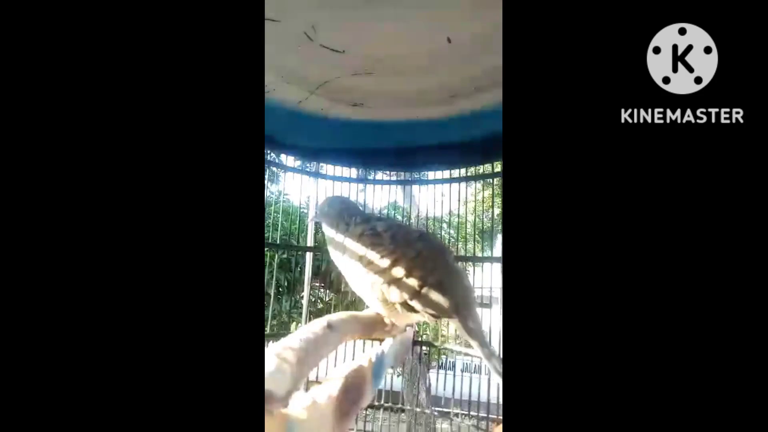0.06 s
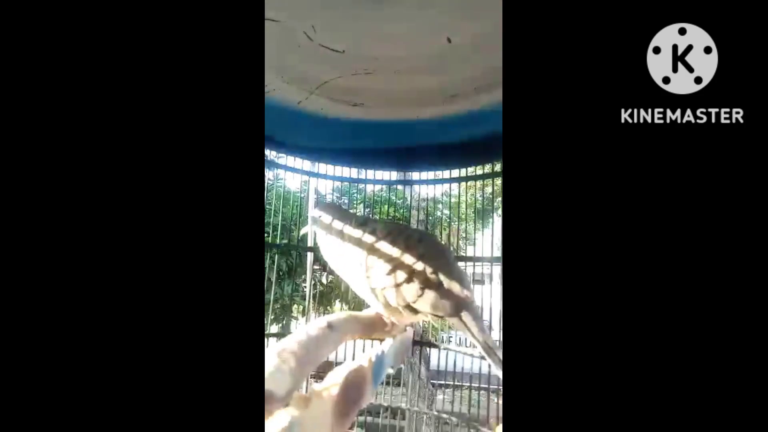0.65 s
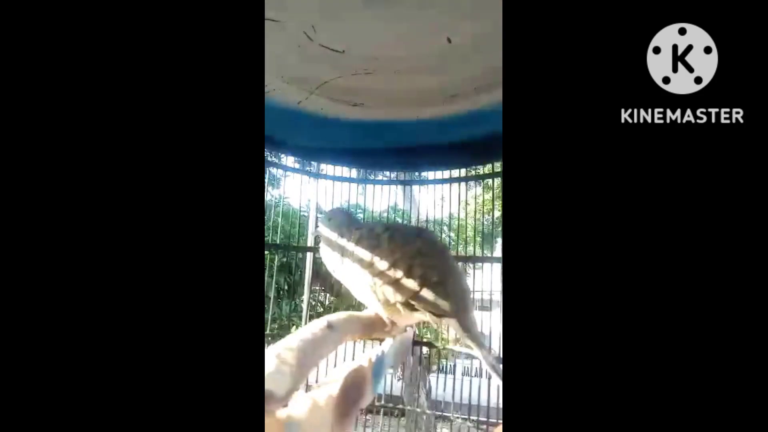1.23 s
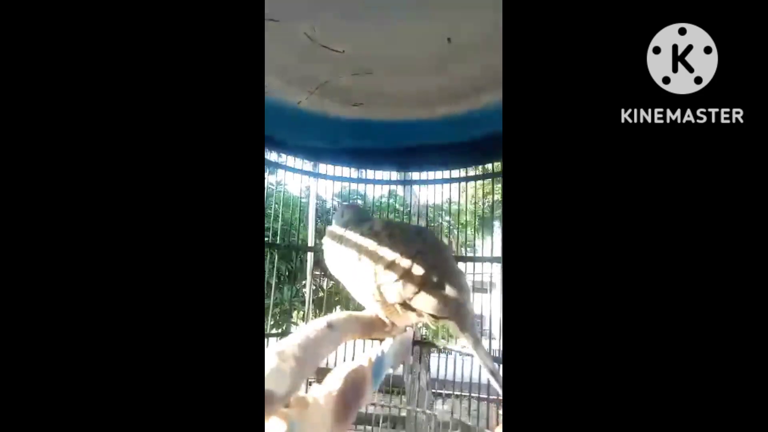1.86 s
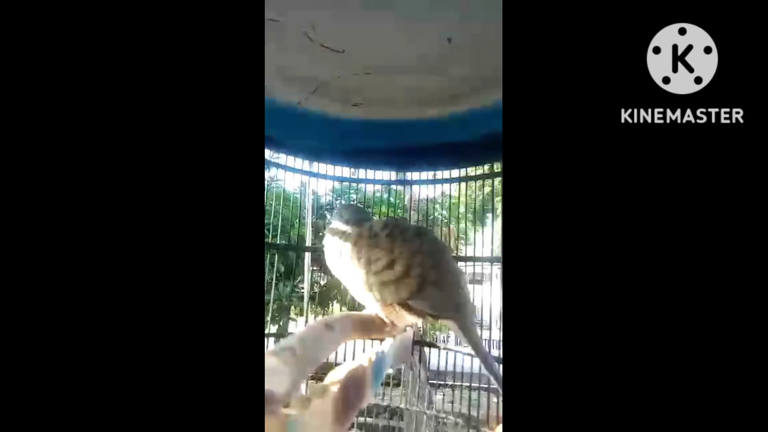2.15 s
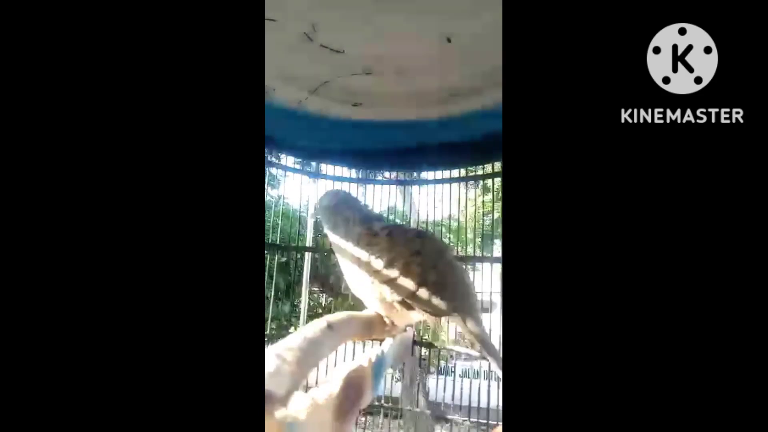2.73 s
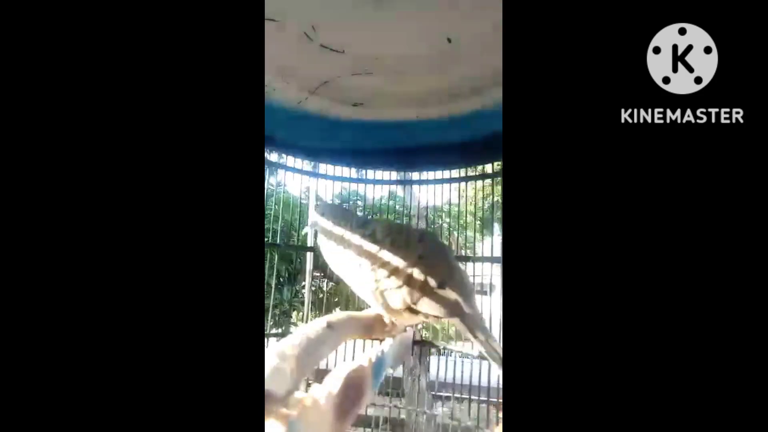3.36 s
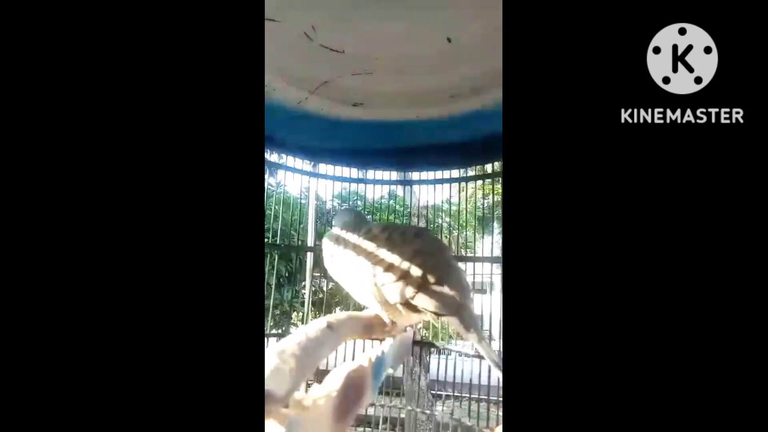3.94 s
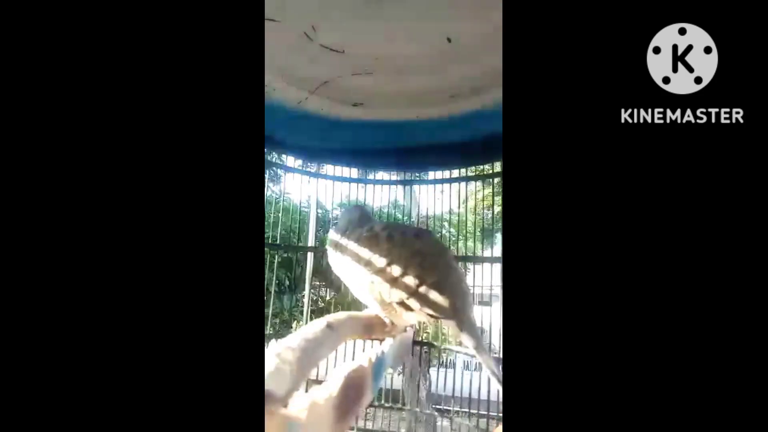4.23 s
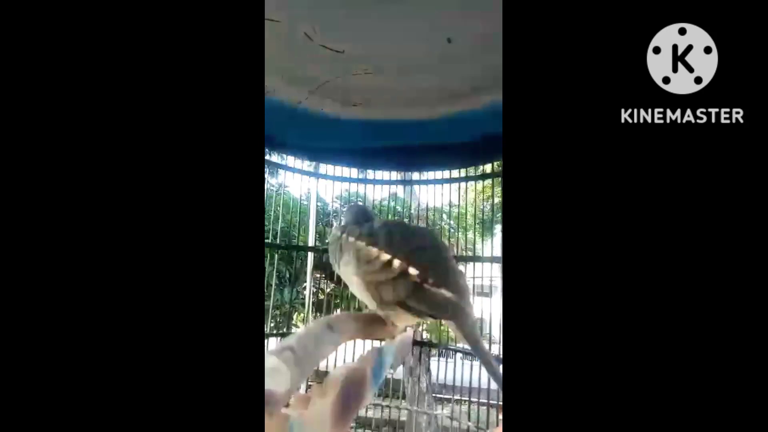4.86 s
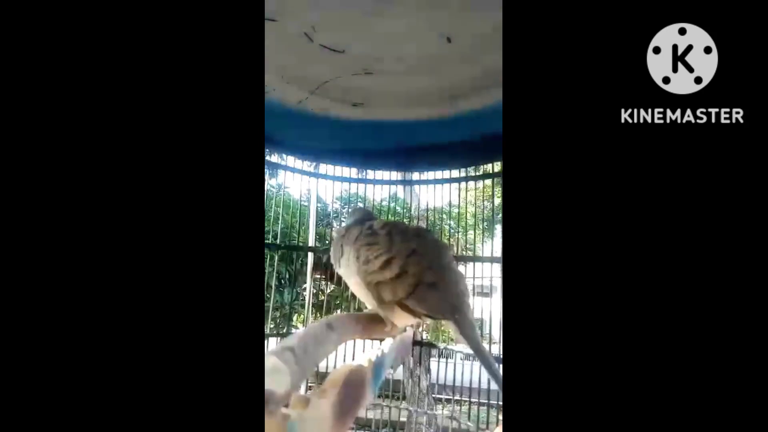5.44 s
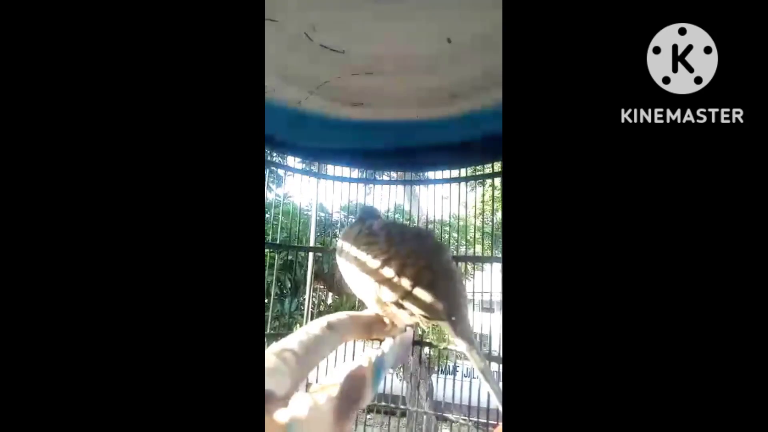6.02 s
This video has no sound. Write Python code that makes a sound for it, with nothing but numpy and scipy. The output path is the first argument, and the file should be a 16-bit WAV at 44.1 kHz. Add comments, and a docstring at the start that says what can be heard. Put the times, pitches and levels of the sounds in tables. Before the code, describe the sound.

A small caged dove coos right at the microphone from about 0.2 to 0.8 seconds: five quick, clipped notes, loud and ringing, with a slight overload buzz. Faint, high chirps from small birds follow between 1.2 and 2.7 seconds, and wings flutter softly farther off from about 2 to 2.9 seconds. The dove repeats its five-note phrase from 3 to 3.6 seconds. After a soft thump, a rooster crows some way off from about 3.9 to 5.6 seconds, quieter than the dove, in four syllables that crack upward in pitch, with some hoarseness and a light outdoor echo. A rasp and a few more chirps overlap the last syllable, and faint rustles trail on until 6 seconds. Throughout, a breeze buffets the microphone with an uneven low rumble over a quiet hiss of leaves and distant streets, both dipping briefly under the coos.

```python
"""Caged dove and rooster in a garden

A small dove coos two quick phrases in a domed cage, right at a phone's microphone. The dome resonates
at the top of each note and overloads the left port, and a suppressor ducks the garden. Then a rooster
crows some way off, four syllables that break between two registers; a rasp and faint rustles trail it.
Small birds chirp, wings flutter, leaves and distant streets hiss, and a breeze buffets the microphone."""
import sys
import numpy as np
from scipy import signal
from scipy.fft import rfft, irfft, next_fast_len
from scipy.io import wavfile
from scipy.ndimage import uniform_filter1d

SR = 44100
rng = np.random.default_rng(int(sys.argv[2]) if len(sys.argv) > 2 else 0)


def dump_mix(stems):
    """Bounce the given channels to the path in sys.argv[1] as a 16-bit WAV at rate SR."""
    frames = np.atleast_2d(stems).T  # one column per channel
    limited = np.clip(frames, -1, 1)  # hard clip at full scale
    pcm = np.round(limited * 32767).astype(np.int16)
    wavfile.write(sys.argv[1], SR, pcm)


N = 272979
TIME = np.arange(N) / SR
FREQS = np.fft.rfftfreq(N, 1 / SR)


def amp(db):
    return 10 ** (np.asarray(db) / 20)


def unit_rms(x):
    return x / np.sqrt(np.mean(abs(x) ** 2) + 1e-20)


def curve_at(hz, points, column=1):
    """Interpolates a table's column on a log-frequency axis."""
    points = np.array(points, float)
    return np.interp(np.log(hz + 1), np.log(points[:, 0] + 1), points[:, column])


def resonance(hz, centre, width):
    """A Lorentzian peak of height 1, with its full width taken at half height."""
    return 1 / (1 + (2 * (hz - centre) / width) ** 2)


def add(mix, start_s, sound):
    """Superposes a sound on the mix, in place."""
    part = mix[max(round(start_s * SR), 0):][:len(sound)]
    part += sound[:len(part)]


def noise(gain):
    """White noise filtered by a gain for each of FREQS."""
    return irfft(rfft(rng.standard_normal(N)) * gain, N)


def wander(rate_hz):
    """A low-passed random fluctuation of rms 1."""
    return unit_rms(noise(1 / (1 + (FREQS / rate_hz) ** 4)))


def yard(x, wet_db, echo_db, echo_s=0.11, reflections_per_s=2000):
    """Reflection between houses: the direct sound, one wall's echo and a diffuse tail for each port."""
    # Reverberation. Each row: frequency in Hz, time to decay by 60 dB in seconds.
    decay_times = [(500, 0.6), (1600, 0.85), (4000, 0.77), (9000, 0.18)]
    taps = rng.standard_normal((2, SR)) * (rng.random((2, SR)) < reflections_per_s / SR)
    hz, t, spectra = signal.stft(taps, SR, nperseg=256)
    decay = amp(-60 * t / curve_at(hz, decay_times)[:, None])
    tail = signal.istft(spectra * decay, SR, nperseg=256)[1]
    tail /= np.linalg.norm(tail, axis=1, keepdims=True)
    echo = np.interp(TIME - echo_s, TIME, x, left=0)
    return x + amp(echo_db) * echo + amp(wet_db) * signal.fftconvolve(x[None], tail, axes=1)[:, :N]


def garden(coherence=0.15):
    """Leaves and distant streets sum to a diffuse hiss, only partly coherent between the ports."""
    # Hiss spectrum. Each row: frequency in Hz, left and right spectral density in dB.
    spectrum = [(100, -74.5, -74.5), (493, -65, -74.5), (950, -64.5, -74), (1720, -68.5, -82),
                (2430, -69, -80), (2760, -72, -85), (4060, -70, -83.5), (5070, -83, -100),
                (6440, -90.5, -92), (10800, -106, -100), (12400, -108, -108), (15000, -102, -114)]
    # Slow swell of the hiss. Each row: time in seconds, gain in dB.
    levels = [(0, 0), (.97, -0.5), (1.53, 0), (1.68, -5), (1.8, 1), (2.7, 1.5), (2.83, -1.5), (3.2, -2),
              (3.65, 2), (4.1, 2), (6.19, -0.5)]
    left, independent = rfft(rng.standard_normal((2, N)))
    right = coherence * left + np.sqrt(1 - coherence ** 2) * independent
    colour = amp([curve_at(FREQS, spectrum, column) for column in (1, 2)])
    hiss = irfft(colour * [left, right], N)
    swell = amp(np.interp(TIME, *np.transpose(levels)) + .7 * wander(35))
    return np.sqrt(SR / 2) * hiss * swell


def breeze(lump_db=3.0, eddy_hz=350, eddy_growth=0.69):
    """Turbulence, separate at each port: in a gust, small eddies grow faster than large ones."""
    # Gusts. Each row: time in seconds, relative level in dB, left minus right in dB.
    gusts = [(0, -20, 16), (.14, -19, 16.5), (.205, -21.5, 15), (.24, -22.5, 14), (0.471, -24.5, 11),
             (.525, -21.5, 12.5), (.6, -27, 16), (.9, -26.5, 5.5), (1.32, -19.5, 16), (1.78, -17, 9.5),
             (1.97, -20.5, 5), (2.009, -34, 5), (2.23, -32, 5.5), (2.33, -25, -5), (2.531, -20, 15.5),
             (2.721, -24.5, 0.5), (2.765, -15.5, 11.5), (2.93, -16.5, 10), (3.03, -21, 4.5),
             (3.2, -20.5, 12.5), (3.26, -15.5, 13), (3.34, -22.5, 15.5), (3.4, -18.5, 9), (3.461, -24, 11),
             (3.581, -28, 6.5), (3.65, -15.5, -13.5), (3.739, -18, -4), (3.85, -17.5, 15), (4.6, -22, 16),
             (4.92, -16, 15.5), (5.071, -25, 2.5), (5.37, -16.5, 8.5), (5.58, -20.5, 11.5),
             (5.645, -16, -1), (5.759, -17, -0.5), (5.859, -17, 7), (6.19, -14.5, 9.5)]
    # Buffeting spectrum. Each row: frequency in Hz, left and right relative level in dB.
    buffet = [(15, -15, -21.5), (42.5, -24.5, -18), (75.3, -6.5, -1.5), (142, -0.5, -3), (199.5, -6, -2.5),
              (299, -18, -6.5), (446, -34.5, -16.5), (764, -49.5, -29), (1510, -76, -65),
              (6000, -110, -100)]
    times, db, lean_db = np.transpose(gusts)
    left_share = 1 / (1 + amp(-lean_db) ** 2)
    ports = []
    for column, power_share in enumerate([left_share, 1 - left_share], 1):
        push = np.interp(TIME, times, 2 * amp(db) * np.sqrt(power_share)) * amp(lump_db * wander(24.6))
        colour = amp(curve_at(FREQS, buffet, column))
        large = noise(colour * (FREQS < eddy_hz))
        small = noise(colour * (FREQS >= eddy_hz))
        ports.append(push * unit_rms(large + small * unit_rms(push) ** eddy_growth))
    return amp(-1.5) * np.array(ports)


def small_birds(arch_hz=189, warble_depth=0.017):
    """Frequency modulation: far-off whistles follow short arched glides with a fast warble."""
    # Chirps in the trees. Each row: start and length in seconds, pitch and sweep in Hz, level in dB.
    chirps = [(.005, 0.11, 4600, -1020, -39), (1.171, 0.075, 4180, 569, -41),
              (1.323, 0.089, 4350, -740, -40.5), (1.58, 0.057, 3990, -700, -42.5),
              (1.89, 0.19, 5850, 1898, -50), (2.092, 0.11, 4900, -400, -47),
              (2.374, 0.092, 3830, -780, -40), (2.57, 0.089, 4580, -600, -47.5),
              (4.902, 0.076, 3370, -46, -33.5), (5.278, 0.078, 3400, 2, -30.5),
              (5.421, 0.052, 2630, -250, -32.5), (5.477, 0.036, 3027, 556, -28),
              (5.733, 0.0824, 3450, 146, -30)]
    song, warble = np.zeros(N), 1 + warble_depth * wander(240)
    for start, length, pitch, sweep, db in chirps:
        along = np.linspace(0, 1, round(length * SR))
        hz = pitch + sweep * (along - .5) - arch_hz * (2 * along - 1) ** 2
        hz *= np.interp(start + along * length, TIME, warble)
        envelope = amp(db) * np.sqrt(4 * along * (1 - along))
        add(song, start, envelope * np.sin(2 * np.pi * np.cumsum(hz) / SR))
    return amp([[1], [-11]]) * yard(song, wet_db=-5, echo_db=-16)


def clucks(flap_s=.0005, flap_hz=900, gap_s=.0044):
    """Damped oscillation: the dove's syrinx flaps before a note, once or in a short rattle."""
    # Rattles. Each row: start in seconds, number of flaps, level in dB.
    rattles = [(0.164, 1, -2.5), (0.2194, 4, 1), (0.542, 1, 0), (0.676, 1, -6), (2.9287, 1, -2.5),
               (2.982, 4, 1), (3.291, 1, -4)]
    t = np.arange(0, 20 * flap_s, 1 / SR)
    flap = t / flap_s * np.exp(-t / flap_s + 2j * np.pi * flap_hz * t)
    voice = np.zeros(N, complex)
    for start, count, db in rattles:
        for k in range(count):
            add(voice, start + k * gap_s, amp(db) * np.sin(np.pi * (k + 1) / (count + 1)) * flap)
    return voice


def coos(end_hz=1049, slur_hz=1110, fall_s=.0107, fade_s=.0037, sag_db_per_hz=.0013):
    """Pressure-driven oscillation: breath lifts and drops the syrinx's pitch and level together."""
    # Coos. Each row: start and end in seconds, top pitch in Hz, level in dB, drift over the note in Hz,
    # swell over the note in dB, opening pitch in Hz, rise time in seconds.
    notes = [(0.2364, 0.364, 1179, -9.8, -86, -5.6, 483, .0093),
             (0.3693, 0.4049, 1193, -9.9, -38, -0.9, 1051, .0107),
             (0.4401, 0.4726, 1215, -9.2, -27, -2.5, 787, .0086),
             (0.55, 0.599, 1211, -9.4, -85, -3.3, 561, .0095),
             (0.6853, 0.8207, 1171, -10.8, -58, -6.3, 559, .011),
             (2.9981, 3.1183, 1170, -11.1, -55, -5.7, 650, .0098),
             (3.1242, 3.161, 1191, -11.2, -43, -4.3, 1072, .0116),
             (3.1895, 3.2259, 1148, -9.3, -113, 0.9, 776, .0071),
             (3.2961, 3.3425, 1193, -10.8, -34, -5.7, 634, .0089),
             (3.4228, 3.5542, 1158, -12.3, -35, -5.7, 569, .0086)]
    # Brief swells and dips of loudness in the long coos. Each row: time in seconds, gain in dB.
    swells_and_dips = [(.297, 2.4), (.311, -2.6), (.324, 1), (.752, 1), (3.058, .6), (3.074, -.8)]
    voice = np.zeros(N, complex)
    pauses = [following[0] - note[1] for note, following in zip(notes, notes[1:])] + [np.inf]
    for (start, end, top_hz, db, drift_hz, swell_db, first_hz, rise_s), pause in zip(notes, pauses):
        last_hz = slur_hz if pause < .012 else end_hz  # a coo that runs into the next falls less
        length = end - start
        t = np.arange(0, length, 1 / SR)
        from_middle = t / length - .5
        sag_hz = (top_hz - first_hz) * np.exp(-t / rise_s)
        sag_hz += (top_hz - last_hz) * np.exp((t - length) / fall_s)
        hz = top_hz - sag_hz + drift_hz * from_middle
        push_db = 2 * (first_hz < 700) * np.exp(-(t / .012) ** 2)  # extra air starts a slack syrinx
        level = amp(db + push_db + swell_db * from_middle - sag_db_per_hz * sag_hz)
        fade = np.clip(np.minimum(t, length - t) / fade_s, 0, 1)
        add(voice, start, level * fade * np.exp(2j * np.pi * np.cumsum(hz) / SR))
    for when, db in swells_and_dips:
        voice *= amp(db * np.exp(-((TIME - when) / .006) ** 2))
    return voice


def dove(octave_db=-29, shimmer=0.0054):
    """Forced resonance: each glide sweeps through the dome's modes and beats with their ringing."""
    # Air modes under the dome. Each row: frequency and bandwidth in Hz, left and right gain in dB,
    # phase at the right port in radians.
    modes = [(953.0, 68.2, 12.3, -1.1, 1.79), (1148.2, 21.8, 16.5, 1.7, -3.38),
             (1161.3, 11.3, -4.7, -16.6, -2.2), (1326.1, 130.1, -14.5, -0.9, -2.2),
             (1071.0, 70.3, -19.0, -6.7, 0.33)]
    voice = (clucks() + coos()) * (1 + shimmer * wander(500))
    ports = np.zeros((2, N))
    for hz, width, left_db, right_db, phase in modes:
        radius = np.exp(-np.pi * width / SR)
        pole = radius * np.exp(2j * np.pi * hz / SR)
        ring = signal.lfilter([1 - radius], [1, -pole], voice + 1e-18)
        ports += np.array([amp(left_db) * ring, amp(right_db) * np.exp(1j * phase) * ring]).real
    octave = (voice * np.exp(1j * np.angle(voice))).real  # goes straight out, past the modes
    reflected = yard(voice.real, wet_db=-27, echo_db=-40) - voice.real
    return ports + amp([[0], [-11]]) * (amp(octave_db) * octave + reflected)


def wings(beat_s=0.079, rise_s=.011, low_hz=600, high_hz=2500):
    """Air displacement: each wingbeat of a bird further off sheds a soft puff of noise."""
    # Bouts of wingbeats. Each row: first beat in seconds, number of beats, level in dB.
    flutters = [(2.069, 3, -33.5), (2.308, 2, -32.5), (2.469, 4, -29), (2.866, 1, -37)]
    age = np.arange(0, 10 * rise_s, 1 / SR) / rise_s
    puff = age * np.exp(1 - age)
    beats = np.zeros(N)
    for start, count, db in flutters:
        for k in range(count):
            add(beats, start + k * beat_s - rise_s, amp(db) * puff)
    band = 1 / (1 + (low_hz / (FREQS + 1)) ** 4) / (1 + (FREQS / high_hz) ** 8)
    air = [unit_rms(noise(band)) for _ in range(2)]
    return amp([[0], [-6]]) * beats * air


def noise_bursts(top_hz=6000):
    """Short noise bursts: a soft thump, a rasp with and after the last crow syllable, faint rustles."""
    # Bursts. Each row: start and length in seconds, centre and bandwidth in Hz, level in dB.
    bursts = [(3.789, 0.0075, 550, 594, -23), (4.933, 0.29, 1440, 2234, -27.5),
              (5.604, 0.13, 1820, 2885, -30.5), (5.88, 0.086, 1400, 2140, -35.5),
              (5.96, 0.055, 2540, 2200, -34)]
    sound = np.zeros(N)
    for start, length, centre, width, db in bursts:
        envelope = np.sin(np.pi * np.clip((TIME - start) / length, 0, 1))
        band = resonance(FREQS, centre, width) / (1 + (FREQS / top_hz) ** 4)
        sound += amp(db) * envelope * unit_rms(noise(band))
    return amp([[3], [-7]]) * sound


def throat_squeaks(length_s=0.014, width_hz=260):
    """Narrow-band noise: a brief squeak as the rooster's throat opens."""
    # Squeaks. Each row: start in seconds, centre in Hz, level in dB.
    catches = [(3.863, 2170, -30.5), (4.174, 2070, -25), (5.003, 1846, -25)]
    squeaks = np.zeros(N)
    for start, centre, db in catches:
        opening = np.sin(np.pi * np.clip((TIME - start) / length_s, 0, 1))
        squeaks += amp(db) * opening * unit_rms(noise(resonance(FREQS, centre, width_hz)))
    return squeaks


def syllable(start, end, up, down, low_hz, high_hz, effort_db, tiring_db_per_s, beak_db, roughness,
             fundamental_db, scoop, dull_db, break_s=0.009, settle_s=.026, droop_per_s=.22):
    """Register break: contours of a voice that jumps upward, then droops as the air runs out."""
    t, length = np.arange(start, end, .001), end - start
    high = (np.tanh((t - up) / break_s) - np.tanh((t - down) / break_s)) / 2
    low = 1 - high
    onset = np.exp((start - t) / settle_s)  # starts flat, rough and soft
    ending = np.exp((t - end) / (0.092 * length))
    hz = (high_hz * high + low_hz * low) * (1 - scoop * onset - droop_per_s * length * ending)
    effort = effort_db - 2.5 * low - 3.5 * onset - tiring_db_per_s * (t - start)
    shut = np.exp((start - t) / 0.072)  # the beak opens, then closes as the pitch droops
    beak = beak_db * (1 - shut) - 18.5 * shut - 20 * ending
    hoarse = np.clip(roughness * high + 0.1778 * low + .55 * onset, 0, 1)
    dull = dull_db * np.exp((t - end) / (0.44 * length))  # upper harmonics fade first
    return np.transpose([t, hz, effort, beak, hoarse, np.full(len(t), fundamental_db), dull])


def rooster(jitter=.05, waver=.016, fade_s=0.0078, beak_hz=3750, cage_hz=1571.4, hollow_db=-10.5):
    """Source and filter: harmonics pass a fixed throat; when hoarse, the pitch shakes and air rasps."""
    # Syllables. Each row: start, end, upward break and drop back in seconds (past the end, it stays up),
    # low and high register in Hz, effort in dB, tiring in dB per second, beak resonance in dB,
    # roughness from 0 to 1, fundamental gain in dB, fraction by which it starts flat,
    # final dulling in dB per harmonic.
    crow = [(3.872, 4.04, 3.942, 4.12, 693, 783.7, -24, 20, -16, 0.092, -5.5, .1, 1),
            (4.176, 4.316, 4.2, 4.36, 790, 980.4, -23.5, 16, 17.5, 0.13, 3, .1, 3.5),
            (4.377, 4.82, 4.432, 4.65, 834.2, 993.3, -23.5, 5.6, 11, 0.4, 2, .1, 2),
            (4.995, 5.611, 5.05, 5.44, 798.4, 807.7, -22.5, 12, -13.5, 0.056, -2.5, .01, 3)]
    # Throat response. Each row: frequency in Hz, gain in dB.
    throat = [(400, -34), (650, 11), (800, -3.5), (980, -1.5), (1250, 2.5), (1600, 3.5), (2000, 5),
              (2200, -28), (2400, -33), (2900, -32.5), (3300, -6), (4000, -11), (4900, -20), (5500, -16.5),
              (6000, -30.5), (6900, -34), (9000, -43), (14000, -52.5)]
    times, *contours = np.concatenate([syllable(*row) for row in crow]).T
    hz, effort_db, beak_db, rough, fundamental_db, dull_db = (np.interp(TIME, times, c) for c in contours)
    gate = sum(np.clip(np.minimum(TIME - start, end - TIME) / fade_s, 0, 1) for start, end, *_ in crow)
    shake = 1 + rough * (jitter * wander(165.5) + waver * wander(30.02))
    phase = 2 * np.pi * np.cumsum(hz * shake) / SR
    harmonics = np.zeros(N)
    for k in range(1, 18):
        beak = np.exp(-((k * hz - beak_hz) / 750) ** 2)
        beak = np.maximum(beak, 0.035 * (k * hz > beak_hz))  # a closed beak slightly dulls all above
        cage_db = 6 * resonance(k * hz, cage_hz, width=13.6)  # a narrow mode near the microphone
        source_db = fundamental_db if k == 1 else -(k - 2) * dull_db + hollow_db * (k == 3)
        filter_db = curve_at(k * hz, throat) + beak * beak_db + cage_db
        harmonics += amp(source_db + filter_db) * np.cos(k * phase)
    pulsed_air = unit_rms(noise(amp(curve_at(FREQS, throat)))) * (1 + np.cos(phase))
    beak_whistle = unit_rms(noise(np.exp(-((FREQS - beak_hz) / 560) ** 2)))
    rasp = amp(-5) * rough * (pulsed_air + amp(beak_db - 10) * beak_whistle)
    shimmer = 1 + .55 * rough * wander(140)
    call = gate * amp(effort_db) * (shimmer * harmonics + rasp) + throat_squeaks()
    return amp([[4], [-3.5]]) * yard(call, wet_db=-3.5, echo_db=-23)


def suppressor(dry, threshold_db=-17, recovery_db_per_s=185, max_excess_db=18):
    """Side-chain compression: a loud midrange tone at either port ducks the bass and the treble."""
    spectrum = rfft(dry)
    bass = irfft(spectrum / (1 + (FREQS / 540) ** 12), N)
    treble = irfft(spectrum - spectrum / (1 + (FREQS / 1580) ** 24), N)
    midrange = irfft(spectrum / (1 + ((FREQS - 1100) / 250) ** 6), N)
    envelope = abs(signal.hilbert(midrange, next_fast_len(N))[:, :N]).max(0)
    fall_db = TIME * recovery_db_per_s
    held_db = np.maximum.accumulate(20 * np.log10(envelope + 1e-6) + fall_db) - fall_db
    excess_db = uniform_filter1d(np.clip(held_db - threshold_db, 0, max_excess_db), size=300)
    return dry + bass * (amp(-0.48 * excess_db) - 1) + treble * (amp(-0.58 * excess_db) - 1)


def scene():
    """Superposition of all the sources at the left and right ports."""
    return garden() + breeze() + small_birds() + dove() + wings() + noise_bursts() + rooster()


def record(dry, full_scale=.99, crackle=0.002, bias=.002, edge_hz=15500):
    """Clipping distortion: after the suppressor, the loudest coos overload and buzz; then a low-pass."""
    ceiling = full_scale * np.repeat(1 + crackle * wander(6600), 2)
    oversampled = signal.resample_poly(suppressor(dry), 2, 1, axis=1)
    clipped = np.clip(oversampled, -ceiling - bias, ceiling - bias)
    low_pass = signal.firwin(1023, edge_hz, window=("kaiser", 9), fs=2 * SR)
    return signal.oaconvolve(clipped, low_pass[None], "same")[:, ::2]


dry = scene()
out = record(dry)
dump_mix(out)
```